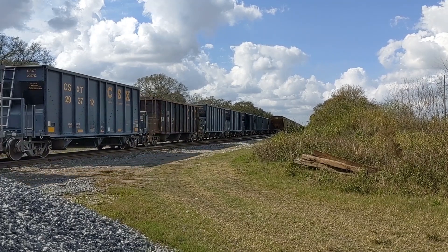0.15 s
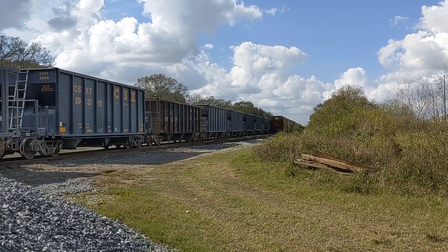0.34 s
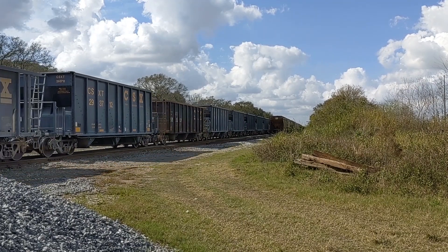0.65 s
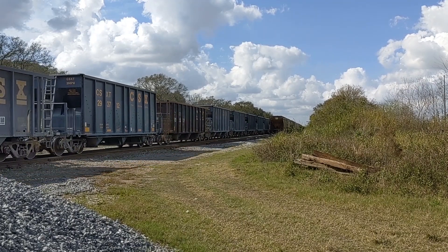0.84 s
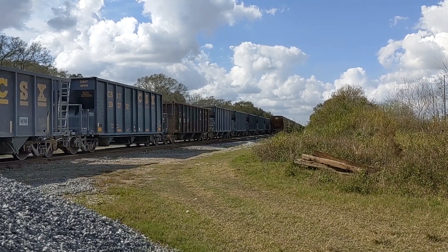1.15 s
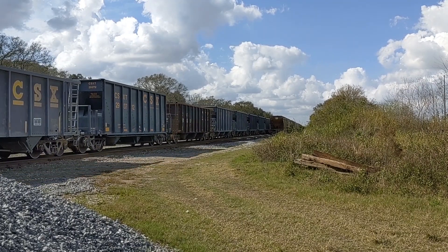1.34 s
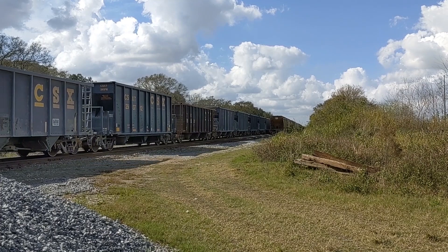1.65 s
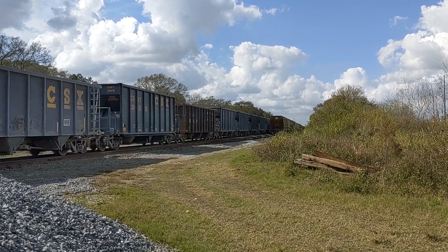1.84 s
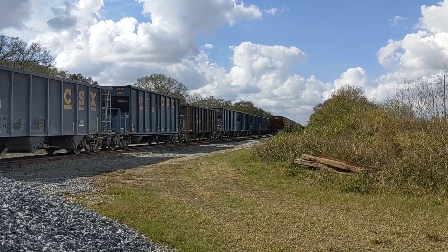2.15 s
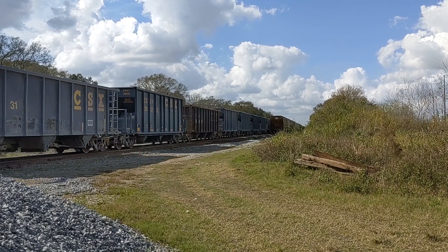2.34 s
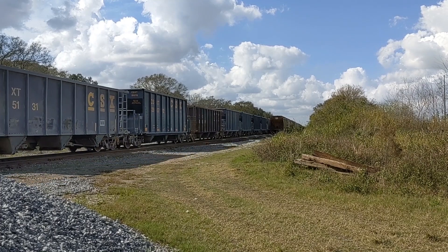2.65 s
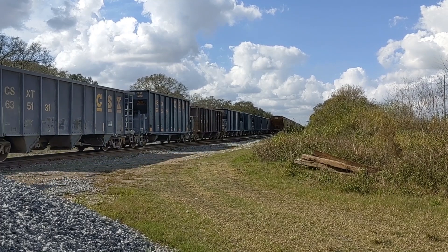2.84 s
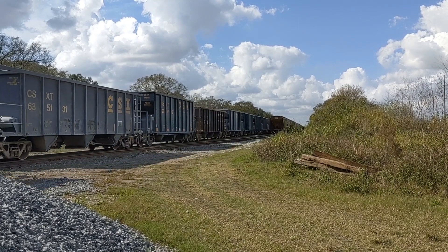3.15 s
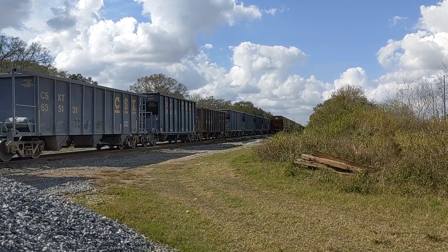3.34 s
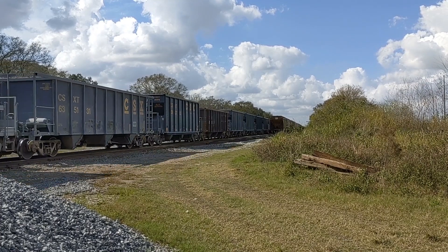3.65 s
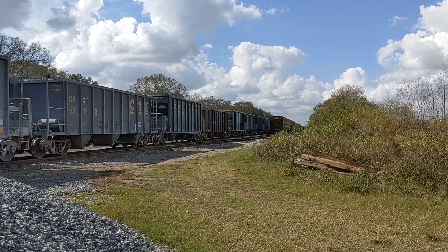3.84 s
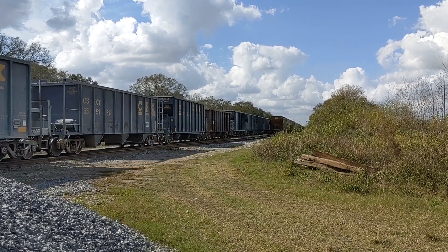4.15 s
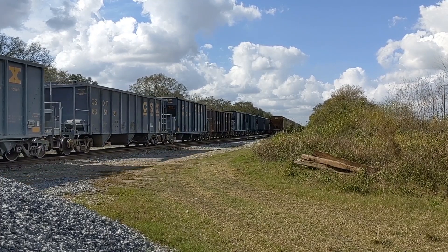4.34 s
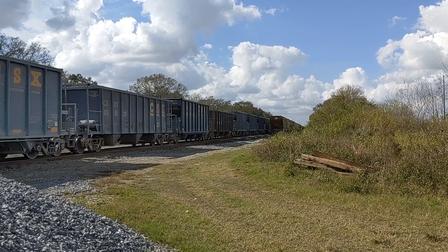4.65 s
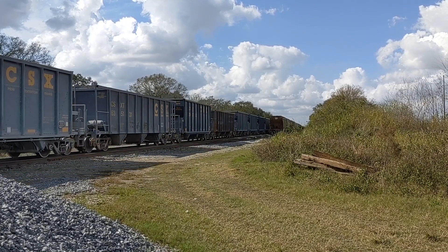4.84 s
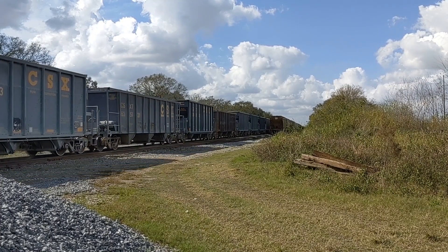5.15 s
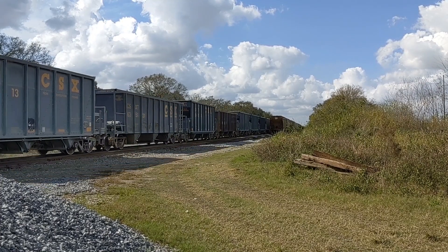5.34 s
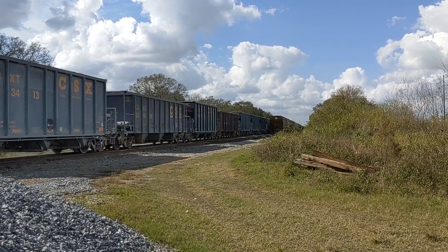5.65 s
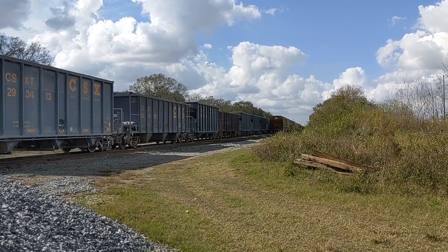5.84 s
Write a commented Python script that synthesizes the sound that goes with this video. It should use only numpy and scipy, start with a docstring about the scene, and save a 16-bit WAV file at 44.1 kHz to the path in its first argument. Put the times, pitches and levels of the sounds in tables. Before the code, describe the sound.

A long freight train of empty hopper cars rolls slowly past, close to a stereo microphone in open air. A low, hollow, uneven rumble continues throughout, easing slightly and dipping most around 4 to 5 s. At once a wheel flange scrapes with bright, gritty hiss, ringing until about 0.7 s, where thin howls swell. The grinding slackens near 1 s; a snap at 1.4 s, a hollow boom at 1.6 s and coupling clunks follow, the strongest at 2.3 s. Beating squeals rise from 1.7 s. From 2.35 to 2.9 s a piercing, almost pure two-note shriek takes over. At 3.15 s a sharp crack starts a loud, harsh squeal, with more snaps to 3.5 s. Another sizzling scrape begins at 4.0 s, growing toward 4.7 s; fluttering metallic squeals start at 4.8 s. Bright snaps at 5.3, 5.45, 5.7 and 5.9 s punctuate continued grinding and knocks, still going at the end.

```python
"""Wheel flanges grind one after another on the curved rail under a slow freight train of empty steel hopper cars.
Gritty stick-slip, made of noise impulses, is radiated through each wheel's modes and joined by beating tones;
single modes howl, and one pair locks into an almost pure shriek. Flanges snap sideways as bursts of bright noise.
Underneath, filtered impulses make the cars rumble, a hollow wagon booms and couplings clunk as struck resonators.
The train passes a few metres to the left of two microphone ports, which hear it with a small delay."""
import sys
import numpy as np
from scipy import signal
from scipy.fft import rfft, irfft, next_fast_len
from scipy.io import wavfile
from scipy.ndimage import uniform_filter1d

SR = 44100
rng = np.random.default_rng(int(sys.argv[2]) if len(sys.argv) > 2 else 0)


def int16_out(signal):
    """Quantize to a 16-bit WAV file."""
    q = np.round(np.clip(np.atleast_2d(signal).T, -1, 1) * 32767)
    wavfile.write(sys.argv[1], SR, q.astype(np.int16))


N = 264147
TIME = np.arange(N) / SR
FFT_SIZE = next_fast_len(N, True)
FREQ = np.arange(FFT_SIZE // 2 + 1) * SR / FFT_SIZE

TOP_HZ = 15800  # upper limit of the sound
BITE_S = .012  # time a wheel takes to start ringing

# spectrum of flange grinding on rail, relative: frequency_hz, density_db (per Hz)
GRIND_COLOUR = [(300, -56), (700, -9.5), (1300, -12), (1900, -1.5), (2600, -1.5), (3200, 4), (4300, -0.5),
                (6000, 2), (8000, 1.5), (11000, 1), (13500, -0.5), (15700, -2)]
# vibration modes of seven passing wheels, relative within each wheel: frequency_hz, level_db
MODES_A = [(1776, -15), (1924, -7), (2174, -14), (2497, -16), (2651, -15), (3994, -8), (4266, -4),
           (4395, -5), (4635, -6), (5003, -5), (5192, -5), (5595, -4), (5652, -9), (5900, -3), (6107, -6),
           (6441, -8), (7000, -4), (7899, -6), (9235, -6), (9544, -6), (10279, -7), (10623, -7),
           (10984, -5), (11401, -4), (11506, -6), (11964, -7), (12658, -3), (15471, -9)]
MODES_B = [(1752, -6), (2783, -4), (3014, -8), (4683, -6), (5100, -9), (5326, -5), (5614, -4), (5827, -7),
           (6010, -7), (6274, -6), (6599, -6), (7237, -8), (8053, 0), (9216, -5), (9501, -3), (9929, -2),
           (10169, -4), (12155, -7)]
MODES_C = [(1746, -17), (2777, -14), (3628, -9), (4077, -14), (4360, -6), (5604, -16), (6002, -9),
           (6266, -12), (7189, -12), (7353, -6), (7525, -7), (8936, -10), (9463, -7), (9910, -9),
           (10150, -11), (10675, -12), (12470, -12), (13754, -13), (14890, -10)]
MODES_D = [(2341, -16), (2686, -11), (2898, -11), (3585, -15), (4314, -10), (4524, -12), (5474, -9),
           (5668, -15), (6188, -13), (6330, -12), (6416, 0), (6557, -11), (7412, -8), (8222, -13),
           (8330, -6), (8419, -5), (8691, -8), (9356, -13), (10047, -11), (10177, -11), (11027, -7),
           (11138, -11), (11571, -14), (15097, -13)]
MODES_E = [(2888, -19), (4306, -13), (8212, -16), (8344, -14), (9251, -12), (9345, -13), (10002, -12),
           (10144, -12), (10222, -11), (10319, -10), (10623, -6), (10998, 0), (11084, -7), (11442, -11),
           (11942, -8), (12774, -5), (12933, -14), (13186, -10), (13813, -10), (14120, -13), (15035, -7),
           (15565, -12)]
MODES_F = [(1820, -22), (2753, -22), (4589, -20), (5469, -12), (6373, -14), (8182, -13), (9983, -2),
           (10107, -16), (10195, -11), (10656, -17), (10984, -9), (11092, -12), (11442, -15), (11797, -14),
           (11883, -11), (12736, -11), (14569, -16), (15509, -13)]
MODES_G = [(1925, -10), (2900, -5), (3561, -2), (4389, -7), (5460, -6), (9999, -2), (10195, -3),
           (10990, -3), (14957, -4)]
# a flange bites, grinds on and lets go; levels are relative:
# start_s, attack_s, hold_s, fade_db_per_s, level_db, low_rasp_db, top_sizzle_db
SCRAPES = [(0.0, 0.012, 0.076, 90, -29, -13, 4.5), (0.076, 0.017, 0.044, 60, -19.5, -2, 2),
           (0.255, 0.019, 0.22, 68, -16, -6.5, -3), (0.385, 0.087, 0.07, 40, -26, 11.5, -6.5),
           (0.69, 0.05, 0.13, 71.5, -27.5, -0.5, -6), (0.937, 0.036, 0.15, 64, -29.5, -8, -8),
           (1.117, 0.022, 0.016, 152, -25, 2.5, -3.5), (1.267, 0.013, 0.051, 386, -25, -4, -3),
           (1.412, 0.0036, 0.0092, 304, -26.5, 4, 1), (1.442, 0.061, 0.024, 56, -18, -5.5, -0.5),
           (1.505, 0.09, 0.075, 27, -16, -3.5, 0.5), (1.69, 0.032, 0.072, 14, -16.5, -0.5, 1),
           (2.025, 0.045, 0.2, 49, -23, 5.5, -1), (2.29, 0.03, 0.084, 20, -15, -2.5, -2),
           (2.752, 0.099, 0.12, 59, -26, 4.5, 1.5), (3.151, 0.0034, 0.034, 44, -11.5, -9.5, -2),
           (3.302, 0.013, 0.015, 76, -16, 2.5, 1.5), (3.481, 0.016, 0.26, 150, -21, 4, 3),
           (3.842, 0.0096, 0.058, 100, -24.5, 5, 2.5), (4.004, 0.008, 0.071, 21, -15, -10.5, 1.3),
           (4.354, 0.19, 0.13, 75, -20.5, -0.5, 6), (4.736, 0.0055, 0.012, 87.5, -17.5, -15, 7),
           (4.784, 0.011, 0.22, 134, -20.5, 2, 4.5), (5.052, 0.092, 0.076, 48, -22, 5.5, 4),
           (5.29, 0.016, 0.05, 102, -22.5, 3, 2.5), (5.438, 0.016, 0.011, 30, -21.5, -5.5, 6.5),
           (5.673, 0.0056, 0.012, 97, -21.5, -7, 8.5), (5.889, 0.032, 0.02, 31, -21.5, -12, 2)]
# wheels further off rub all along the train, relative: level_db (at mid-time), low_rasp_db, top_sizzle_db
RUBBING = (-31.5, 3, -0.97)


def undb(db):
    """Level law: decibels to amplitude gain."""
    return np.exp(np.asarray(db) * (np.log(10) / 20))


def unit(x):
    """Normalisation: scale to an rms of 1."""
    return x / np.sqrt(np.mean(x ** 2))


def curves(table):
    """Linear interpolation: the columns of a table, joined by straight lines in time."""
    s, *columns = np.transpose(table)
    return [np.interp(TIME, s, c) for c in columns]


def during(table):
    """Exponential gating: 1 between a table's first and last row, with a quick rise before and a fade after."""
    before = (table[0][0] - TIME) / .004
    after = (TIME - table[-1][0]) / .025
    return np.exp(-np.maximum(0, np.maximum(before, after)))


def held(start, attack_s, hold_s, fade_db_per_s):
    """Forced vibration and free decay: attack, hold and exponential release, as a gain."""
    age = TIME - start
    release = np.maximum(age - attack_s - hold_s, 0)
    return np.clip(age / attack_s, 0, 1) * undb(-fade_db_per_s * release)


def blows(table, settle_s):
    """Impact: the envelope of each blow starts at once and dies exponentially."""
    return sum(undb(db) * (TIME >= s) * np.exp(-np.abs(TIME - s) / settle_s) for s, db in table)


def colour_db(points, hz):
    """Spectral envelope: levels interpolated on a log-frequency axis."""
    f, db = np.transpose(points)
    return np.interp(np.log(hz + 1), np.log(f), db)


def shape(x, gain):
    """Linear filtering: multiply the spectrum by a gain for each frequency."""
    return irfft(rfft(x, FFT_SIZE) * gain, FFT_SIZE)[..., :N]


def walk(rate, time=TIME):
    """Random modulation: random levels, rate per second, joined by straight lines; spread near 1."""
    steps = time * rate + rng.random()
    return np.sqrt(1.5) * np.interp(steps, np.arange(1024), rng.standard_normal(1024))


def ports(direct, scattered, lag_ms, share):
    """Arrival delay: direct sound reaches the left port first; scattered sound takes a share of the power."""
    late = shape(direct, np.exp(-2j * np.pi * FREQ * lag_ms / 1000))
    share = np.clip(share, 0, 1)
    return shape(np.array([direct, late]), np.sqrt(1 - share)) + shape(scattered, np.sqrt(share))


def grit(rate, spread_db):
    """Shot noise: dense micro-slips of very unequal size, rate per second."""
    size = undb(spread_db * np.minimum(rng.exponential(size=N), 5)) * rng.standard_normal(N)
    return unit(size * (rng.random(N) < rate / SR))


def tone(hz, time, waver, beating=0, scatter_rad=0.66):
    """Beating: a mode and its twin at both ports; uneven slipping jitters the pitch by the share waver."""
    split_hz = 30  # mean spacing of the pair into which the turning wheel splits a mode
    phase = 2 * np.pi * np.cumsum(hz * (1 + waver * walk(160, time))) / SR
    beat_cycles = rng.random() + np.cumsum(split_hz * (1 + .3 * walk(12, time))) / SR
    beat = np.float32(2 * np.pi * beat_cycles)
    # the two ports hear each mode about a quarter cycle apart, wandering
    lag = rng.choice([-1, 1]) * np.pi / 2 + scatter_rad * walk(4.005, time)
    phases = np.float32([phase, phase - lag])
    pair = np.sin(phases) + beating * np.sin(phases - beat)
    return pair * np.sqrt(2 / (1 + beating ** 2))


def rolling_db():
    """Amplitude modulation: level changes of the low and the higher rumble, as dips and smooth surges."""
    # the rumble dips briefly: start_s, end_s, low_depth_db, higher_depth_db
    dips = [(0.227, 0.517, 5.5, 2), (2.433, 2.725, 12.5, 3.5), (3.19, 3.44, 6.5, 5.5),
            (4.008, 5.073, 12, 16), (5.67, 5.81, 7.5, 9)]
    # a bogie rolls over a rough stretch and the rumble changes: peak_s, half_length_s, low_db, higher_db
    surges = [(1.52, 0.036, 5.5, 4.5), (3.01, 0.13, 1.5, 3), (3.764, 0.05, 3, -0.5), (4.694, 0.27, -4, 3.5),
              (5.203, 0.048, 1.5, 7.5)]
    sink_s, recover_s = 0.026, 0.031  # time constants of a dip
    change = np.zeros((2, N))
    for start, end, *depth_db in dips:
        sunk = 1 - np.exp(-np.maximum(TIME - start, 0) / sink_s)
        recovery = np.exp(-np.maximum(TIME - end, 0) / recover_s)
        change -= np.outer(depth_db, sunk * recovery)
    for peak, half_s, *rise_db in surges:
        change += np.outer(rise_db, np.exp(-((TIME - peak) / half_s) ** 2))
    return change


def rumble(throb_db=2.5, scatter_hz=900, recede_db_per_s=0.36):
    """Roughness excitation: treads shake track and hollow wagons; the ports are most alike in the bass."""
    # spectrum of the rolling, relative: frequency_hz, density_db (per Hz)
    roll_colour = [(15, -47), (25, -30), (70, -0.5), (182, -1.5), (216, -2), (264, -2.5), (461, -1.5),
                   (845, -9.5), (967, -5.5), (1200, -9), (1400, -5.5), (1820, -3.5), (3080, -120)]
    roll_db, higher_db = -37.5, 0.05  # base level at the start; higher rumble relative to the low
    scattered_share = 0.056 + 0.82 * FREQ / (FREQ + scatter_hz)
    treads = grit(rate=2500, spread_db=1.5)
    shaking = ports(treads, rng.standard_normal((2, N)), lag_ms=0.38, share=scattered_share)
    shaking = shape(shaking, undb(colour_db(roll_colour, FREQ)))
    bass = 1 / (1 + (FREQ / 300) ** 8)
    low_change_db, higher_change_db = rolling_db()
    low = unit(shape(shaking, bass)) * undb(low_change_db)
    higher = unit(shape(shaking, 1 - bass)) * undb(higher_db + higher_change_db + throb_db * walk(35))
    return (low + higher) * undb(roll_db - recede_db_per_s * TIME)


def boom():
    """Resonance: rolling noise drives one empty wagon's side wall; alike at both ports."""
    # the wall's excitation: start_s, attack_s, hold_s, fade_db_per_s, level_db
    start, attack_s, hold_s, fade, db = (1.5, 0.12, 0.03, 23, -33.5)
    wall_hz, width_hz = 214.4, 19  # the wall's lowest strong resonance
    resonance = 1 / (1 + (2 * (FREQ - wall_hz) / width_hz) ** 2)
    wall = unit(shape(rng.standard_normal(N), resonance))
    return wall * held(start, attack_s, hold_s, fade) * undb(db)


def clunks(gain_db=-3):
    """Impact excitation of modes: noisy blows ring the wagon frame; bare steel faces add a brief clack."""
    # couplings and bogies knock: start_s, level_db (before gain_db), clack_db (relative to level_db)
    knocks = [(1.474, -25, -19), (1.6, -22.5, -17), (1.852, -19.5, -12), (2.276, -16, -10), (2.77, -22, -9),
              (3.189, -23, -11), (4.763, -31.5, -10), (5.081, -24.5, -12), (5.505, -20, -6),
              (5.671, -22.5, 5)]
    # ring of a wagon frame: frequency_hz, level_db (relative), t60_s
    frame_modes = [(104, -23, 0.29), (161, -2, 0.26), (227, 13, 0.18), (325, -1.5, 0.094),
                   (447, 4.5, 0.0055), (605, -10, 0.0075), (737, 5, 0.06), (1860, 7.5, 0.0057)]
    clack_hz, clack_width_hz = 2130, 2200  # the short, hard note of steel faces meeting
    frame = sum(undb(db) / (1 + 1j * (FREQ - hz) * 2 * np.pi * t60 / np.log(1000))
                for hz, db, t60 in frame_modes)
    frame = frame / np.sqrt(np.mean(np.abs(frame) ** 2))
    force = ports(rng.standard_normal(N), rng.standard_normal((2, N)), lag_ms=0.34, share=0.1)
    thud = shape(force * blows([row[:2] for row in knocks], settle_s=0.02), frame)
    face = 1 / (1 + 1j * (FREQ - clack_hz ** 2 / (FREQ + 1)) / clack_width_hz)
    face = face / np.sqrt(np.mean(np.abs(face) ** 2))
    contact = blows([(s, db + clack_db) for s, db, clack_db in knocks], settle_s=0.0078)
    clack = shape(force * contact, face)
    return undb(gain_db) * (thud + clack)


def snaps(gain_db=-3):
    """Transient friction: a bright crack of decaying noise where a flange bites."""
    # a flange snaps sideways: start_s, level_db (before gain_db)
    bites = [(0.0886, -21), (1.4177, -16), (3.1536, -17), (3.3224, -15.5), (3.493, -16), (4.0117, -22),
             (5.2849, -12.5), (5.4453, -15.5), (5.6785, -14), (5.9325, -16)]
    crack = unit(shape(rng.standard_normal((2, N)), undb(colour_db(GRIND_COLOUR, FREQ))))
    return undb(gain_db) * crack * blows(bites, settle_s=0.019)


def shriek(gain_db=-1.5):
    """Self-sustained oscillation: two modes locked in stick-slip, almost pure, each slightly beating."""
    # levels of two modes of the third wheel, before gain_db: time_s, lower_mode_db, upper_mode_db
    locked_levels = [(2.32, -34, -37), (2.371, -33, -22), (2.45, -20, -16.5), (2.56, -16, -17.5),
                     (2.682, -16, -13.5), (2.9, -32, -18.5), (3.0, -36, -35), (3.14, -41, -37)]
    # frequencies of the lower and upper mode: lower_hz, upper_hz
    locked_hz = (8021, 8264)
    pair = 0
    for hz, db in zip(locked_hz, curves(locked_levels)):
        mode = tone(hz, TIME, waver=.0009, beating=.2, scatter_rad=.15)
        pair = pair + mode * undb(db + walk(30))
    return pair * undb(gain_db) * during(locked_levels)


def howls(gain_db=1.0, swell_db=14):
    """Friction-driven instability: now and then one mode feeds on the slip, swells, throbs and dies away."""
    # single modes that howl: start_s, peak_s, end_s, pitch_hz, level_db (before gain_db), beating (0-1)
    howling_modes = [(0.41, 0.702, 1.06, 3980, -26.5, 0.22), (0.45, 0.71, 1.08, 2180, -33, 0.2),
                     (.4, 0.51, 0.76, 1150, -39.5, 1), (0.704, 0.839, 1.06, 8020, -31.5, .4),
                     (1.45, 1.476, 2.7, 11164, -25, 0.26), (1.7, 1.74, 2.02, 11240, -24.5, 0.2),
                     (1.9, 1.993, 2.5, 10600, -30, 0.2), (1.684, 1.73, 2.3, 4340, -29, .9),
                     (1.7, 1.748, 1.88, 2780, -29, 0.3), (1.719, 1.915, 2.03, 4390, -20, .95),
                     (1.81, 2.01, 2.54, 1758, -32.5, 0.7), (1.858, 2.067, 2.46, 7570, -24, 0),
                     (2.302, 2.328, 2.46, 6320, -23, .6), (2.305, 2.483, 2.4, 4430, -22, .8),
                     (2.39, 2.45, 2.62, 2770, -20.5, .4), (2.541, 2.673, 2.9, 3610, -26, 0.1),
                     (2.868, 2.974, 3.54, 6240, -28.5, 0), (3.15, 3.176, 3.27, 6500, -20, 0.32),
                     (3.152, 3.19, 3.27, 8333, -18, .5), (3.15, 3.196, 3.36, 8350, -22, 0.5),
                     (3.149, 3.206, 3.3, 7460, -19, .5), (3.243, 3.378, 3.45, 6420, -20, 0),
                     (3.348, 3.507, 3.89, 2348, -31.5, 0), (4.362, 4.525, 4.83, 4303, -29, 0.2),
                     (4.78, 4.797, 5.1, 2757, -28, 1), (4.783, 4.82, 4.94, 4589, -28, .9),
                     (4.8, 4.91, 5.4, 9984, -26, 0.5), (4.849, 5.207, 5.7, 994, -39.5, 0.8),
                     (4.963, 5.1, 5.17, 4292, -23.5, 0.2), (4.86, 5.036, 5.46, 5470, -26, 0.45),
                     (4.878, 5.132, 5.5, 3540, -29, 0.42), (5.68, 5.71, 5.81, 6400, -31, 0.5),
                     (5.675, 5.692, 5.7, 10000, -21, 1)]
    chatter_rate = 55.27  # random stick-slip levels per second
    fade_s = 0.017  # time constant of a spent howl
    out = np.zeros((2, N))
    for start, peak, end, hz, db, beating in howling_modes:
        live = (TIME > start) & (TIME < end + 4 * fade_s)
        time = TIME[live]
        swell = np.interp(time, [start, peak, end], [-swell_db, 0, -swell_db])
        chatter_db = 2.5 * walk(chatter_rate, time)
        fade = np.exp(-np.maximum(time - end, 0) / fade_s)
        onset = np.minimum((time - start) / BITE_S, 1)
        size = undb(gain_db + db + swell + chatter_db) * fade * onset
        out[:, live] += size * tone(hz, time, waver=.001, beating=beating)
    return out


def judder(rate=45, settle_s=0.024):
    """Relaxation: random slips start at once and ease off exponentially; mean 0, spread 1."""
    kicks = (rng.random(N) < rate / SR) * rng.uniform(0.37, 1, N)
    bursts = signal.lfilter([1], [1, -np.exp(-1 / (settle_s * SR))], kicks)
    return unit(bursts - bursts.mean())


def scrape_powers():
    """Power of friction over time: a row for the slowly growing rubbing and one for each scrape."""
    rise_db_per_s = 1
    rubbing = undb(RUBBING[0] + rise_db_per_s * (TIME - TIME.mean()))
    scrapes = [undb(db) * held(start, attack_s, hold_s, fade)
               for start, attack_s, hold_s, fade, db, _, _ in SCRAPES]
    return np.array([rubbing] + scrapes) ** 2


def grinding(powers, gain_db=0.0, judder_db=0.72, flicker_db=1.96):
    """Stick-slip noise: micro-slips of flange on rail in juddering bursts; each scrape has its own colour."""
    rasp_db, sizzle_db = np.transpose([row[-2:] for row in [RUBBING] + SCRAPES])
    slips = ports(grit(rate=14000, spread_db=1.8), rng.standard_normal((2, N)), lag_ms=.43, share=.4)
    slips = unit(shape(slips, undb(colour_db(GRIND_COLOUR, FREQ))))
    edges_hz = [0, 1500, 2400, 3800, 5400, 7200, 9400, 11500, 13500, SR / 2]
    spectrum, out = rfft(slips, FFT_SIZE), 0
    for lo, hi in zip(edges_hz, edges_hz[1:]):
        centre = (lo + hi) / 2
        rasp_part = np.interp(centre, [3000, 6000], [1, 0])
        sizzle_part = np.interp(centre, [6000, 10500], [-.4, 1])
        db = rasp_db * rasp_part + sizzle_db * sizzle_part
        size = np.sqrt(undb(db) ** 2 @ powers)  # powers of all scrapes add in each band
        band = irfft(spectrum * ((FREQ >= lo) & (FREQ < hi)), FFT_SIZE)[:, :N]
        out = out + band * size * undb(flicker_db * walk(25))
    return out * undb(gain_db + judder_db * judder())


def wheel_colour(modes, depth_db, count=80):
    """Modal radiation: narrow peaks at a wheel's modes, a random crowd of others, and valleys between."""
    skirt_hz, lowest_hz = 23, 3600  # width of a peak; where the crowd begins, before its scatter
    centres_hz = np.linspace(lowest_hz, TOP_HZ, count)
    scatter = rng.standard_normal((count, 2))
    crowd = [(hz + 70 * a, -9 + 6 * b) for hz, (a, b) in zip(centres_hz, scatter)]
    humps = np.zeros((2, len(FREQ)))
    for hz, db in list(modes) + crowd:
        near = slice(*np.searchsorted(FREQ, [hz - 300, hz + 300]))
        # each port hears each mode with its own strength
        at_ports = 4 * undb(min(db, -5) + 3 * rng.standard_normal((2, 1)))
        humps[:, near] += at_ports / (1 + ((FREQ[near] - hz) / skirt_hz) ** 2) ** 2
    power = humps + undb(-depth_db) ** 2
    # dividing by the local mean power leaves the broad colour of the grinding
    return np.sqrt(power / uniform_filter1d(power, size=16000))


def ringing(modes, ring, gain_db=0.6, treble_damping=0.072):
    """Modal damping: a slipping wheel's modes flutter and beat; the higher ones fade faster."""
    live = ring > ring.max() / 20
    time, ring_db, out = TIME[live], 20 * np.log10(ring[live]), np.zeros((2, N))
    total, sound = np.sqrt(sum(undb(db) ** 2 for _, db in modes)), 0
    for hz, db in modes:
        fading_db = treble_damping * np.log(hz / 6000) * (ring_db - ring_db.max())
        flutter_db = 3.5 * walk(9, time) + 2.5 * walk(55, time)
        mode = tone(hz, time, waver=.0006 + 7 / hz, beating=.5)
        sound = sound + undb(db + ring_db + fading_db + flutter_db) * mode
    out[:, live] = sound * undb(gain_db) / total
    return out


def wheels():
    """Resonant radiation: the harder a wheel rings, the more of the grinding passes through its modes."""
    # a wheel rings from the bite, changes level up to the peak and dies away; levels are relative:
    # modes, start_s, peak_s, level_db, swell_db, fade_db_per_s, left_minus_right_db
    passing_wheels = [(MODES_A, 0.09, 0.59, -20.5, 5, 61, -1.3), (MODES_B, 1.70, 1.77, -25, 3, 22.6, 2.3),
                      (MODES_C, 2.315, 2.69, -25, 0.97, 53, 0.3),
                      (MODES_D, 3.153, 3.496, -24, -0.24, 49, 0.4),
                      (MODES_E, 4.012, 4.72, -21.5, 6.5, 79, -2.2),
                      (MODES_F, 4.785, 4.973, -20, -1.47, 48, -1.6),
                      (MODES_G, 4.9, 5.76, -34, 0.83, 9.7, -1.5)]
    # valleys between the resonances, one value for each wheel: depth_db
    valleys = [15, 9, 22, 22, 19, 20, 7]
    powers = scrape_powers()
    grind = grinding(powers)
    bare = (undb(-12) * np.sqrt(powers.sum(axis=0))) ** 4  # weight of grinding without wheel resonances
    coloured, weights, tones = bare * grind, bare, 0
    for (modes, start, peak, db, swell_db, fade, pan_db), depth_db in zip(passing_wheels, valleys):
        swell = np.interp(TIME, [start, peak], [-swell_db, 0])
        ring = held(start, BITE_S, peak - start - BITE_S, fade) * undb(db + swell)
        sides = undb(np.array([[pan_db], [-pan_db]]) / 2)
        weight = ring ** 4
        coloured = coloured + sides * weight * shape(grind, wheel_colour(modes, depth_db))
        weights = weights + weight
        tones = tones + sides * ringing(modes, ring)
    return coloured / weights + tones


def scene():
    """Superposition: the wheels sing in turn over the rolling of the train."""
    return rumble() + boom() + clunks() + snaps() + shriek() + howls() + wheels()


def record(dry):
    """Reception: the ports differ in colour, high peaks are rounded and the top is cut steeply."""
    # difference between the ports: frequency_hz, left_minus_right_db
    port_balance = [(300, -0.5), (2000, -1.5), (4000, 0), (5200, 9.5), (6200, 4.5), (7500, 0.5),
                    (9000, 3.5), (10400, -11.5), (12700, -3.5), (14300, 5), (15500, -21)]
    balance_db = colour_db(port_balance, FREQ)
    gains = undb(np.array([balance_db, -balance_db]) / 2)
    heard = shape(dry, gains / np.sqrt(np.mean(gains ** 2, axis=0)))
    rounded = heard / (1 + (heard / .95) ** 6) ** (1 / 6)
    return shape(rounded, 1 / np.sqrt(1 + (FREQ / TOP_HZ) ** 200))


dry = scene()
out = record(dry)
int16_out(out)
```